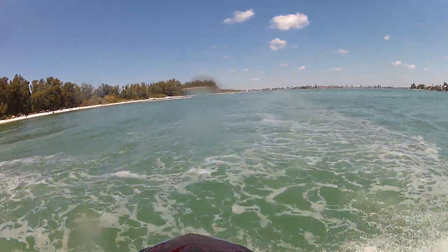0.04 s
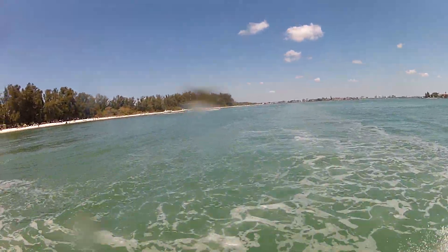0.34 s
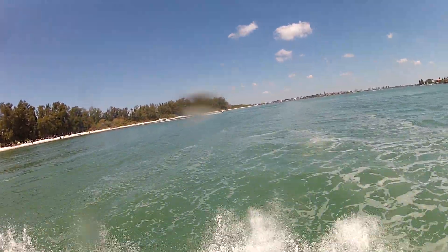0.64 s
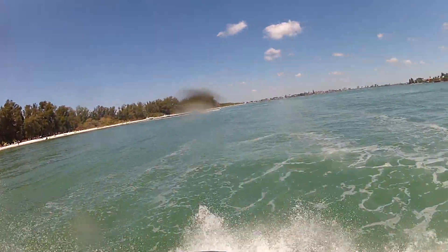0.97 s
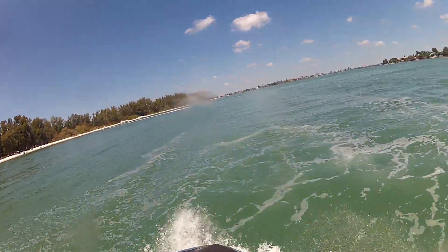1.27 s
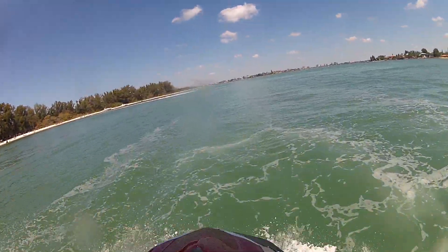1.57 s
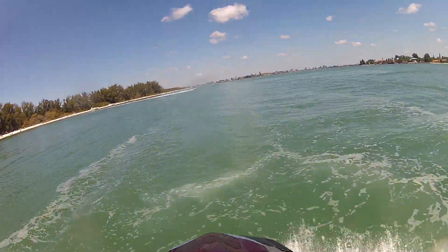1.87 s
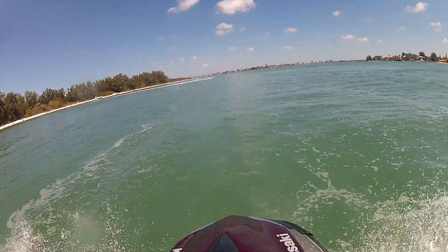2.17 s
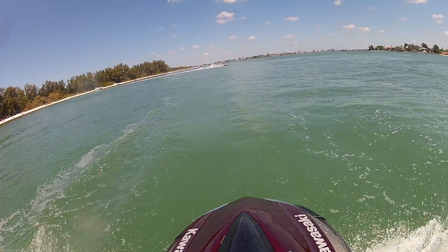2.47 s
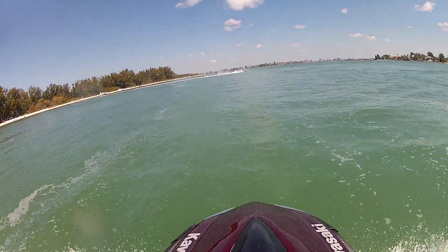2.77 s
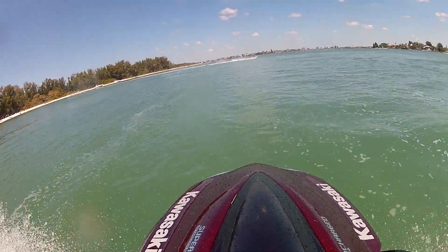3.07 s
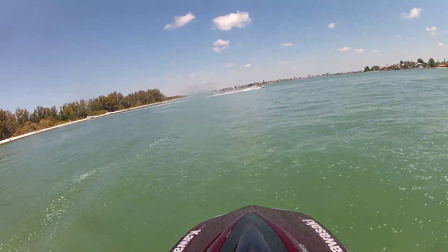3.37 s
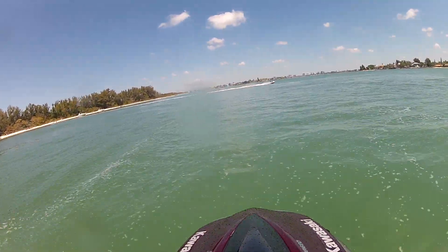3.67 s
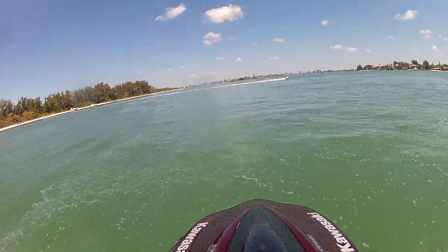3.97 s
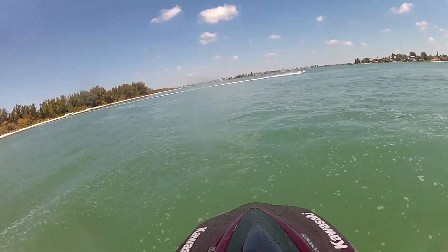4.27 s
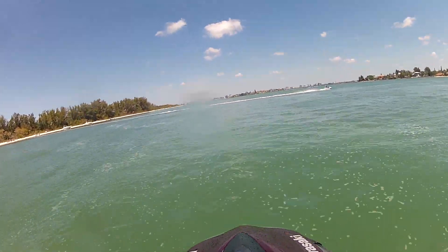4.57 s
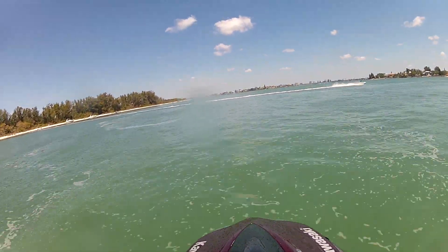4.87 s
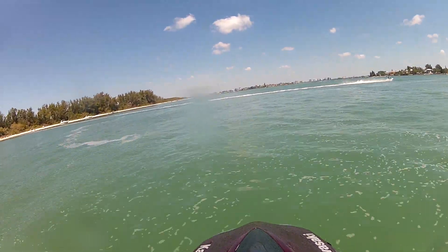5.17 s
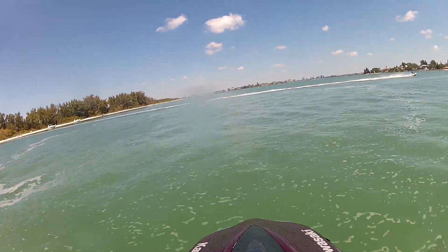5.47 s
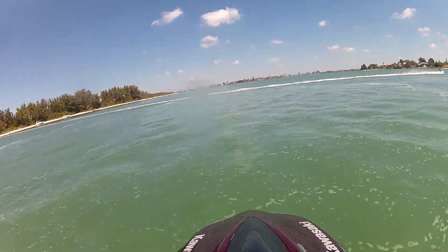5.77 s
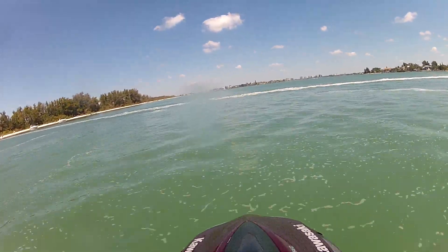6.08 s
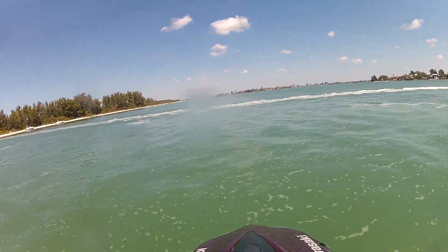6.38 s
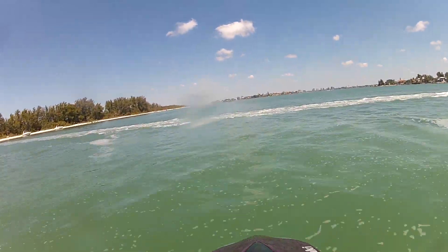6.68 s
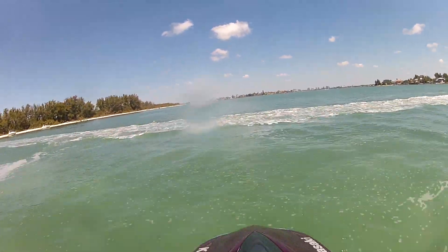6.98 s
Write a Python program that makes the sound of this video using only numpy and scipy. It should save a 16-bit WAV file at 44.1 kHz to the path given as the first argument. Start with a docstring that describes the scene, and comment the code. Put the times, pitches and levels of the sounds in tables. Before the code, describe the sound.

Close jet ski engine cruising with a whine and splashes, then accelerating hard into buffeting, whistling wind on open water.

```python
"""A jet ski on open water, heard up close from a cased camera worn by the rider.
It cruises through a turn: the four-cylinder engine hums, its gears whine and ring the hull, spray hisses.
At 3 s the throttle opens and the revs shoot up with thin, high tones. From 4 s the hull lifts on to the
plane over churning water; wind takes over, buffets the microphone and, past 5 s, whistles in the case.
Throughout, the recorder samples slowly and holds each sample, which gives a gritty treble."""
import sys
import numpy as np
from scipy import signal
from scipy.fft import rfft, irfft
from scipy.io import wavfile

SR = 44100
rng = np.random.default_rng(int(sys.argv[2]) if len(sys.argv) > 2 else 0)


def store_wav(level_fs):
    """Save 16-bit WAV to argv[1]."""
    pcm = np.round(np.clip(np.atleast_2d(level_fs), -1, 1) * 32767)
    wavfile.write(sys.argv[1], SR, pcm.T.astype(np.int16))


N = 310023
TIME = np.arange(N) / SR
HOLD_HZ = 8000  # the recorder's sampling rate

# air and water rushing past the rider, louder as the craft gathers speed: t/s, level/dB
RUSH = [(0.1, -46.5), (0.62, -44), (0.8, -46.5), (2.79, -46), (3.49, -33), (3.97, -30.5), (4.28, -25),
        (4.39, -27.5), (5.25, -20), (6.95, -21)]
# gusts on the case: middle t/s, length/s, wind lift/dB, buffeting lift/dB
GUSTS = [(.18, 0.34, 15, 7), (4.5, 0.064, 2, -2), (4.77, 0.081, 2.5, 2), (4.99, 0.097, 2, 3.5),
         (5.21, 0.24, 1, 4.5), (6.31, 0.13, 1.5, 0)]
# spectrum of the buffeting at the microphone: f/Hz, level/dB
BUFFET_SPECTRUM = [(12, -23), (28, -2), (50, -2.5), (85, -1.5), (160, -1), (230, -8.5), (330, -16.5),
                   (600, -21)]
# spectrum of the wind inside the case: f/Hz, level/dB
WIND_SPECTRUM = [(150, -22), (320, -15), (720, -15), (920, -7), (1110, -5), (1270, -5.5), (1530, -10.5),
                 (1900, -4), (2150, -2), (2440, 0), (2720, -5.5), (3050, -17.5), (3250, -16.5), (3620, -18)]
# the case whistles up: middle t/s, length/s, lift/dB, pitch bend/Hz, share of steady tone/0-1
CASE_WHISTLES = [(5.4, 0.39, 6.5, -21.5, 0.16), (5.78, .18, 8, 46, 0.44), (6.65, 0.086, 9, 11, 0.17),
                 (6.86, .26, 12.5, 100, 0.84)]
# spectrum of the water churning under the hull: f/Hz, level/dB
WASH_SPECTRUM = [(140, -1), (180, 0.5), (260, -14), (380, -11.5), (520, -7.5), (800, -10), (1000, -20),
                 (1500, -40)]
# spectrum of the spray: f/Hz, level/dB
SPRAY_SPECTRUM = [(150, -2), (290, -3), (400, -7.5), (730, -16.5), (960, -12.5), (1100, -0.5), (1280, -11),
                  (1680, -10.5), (1860, -2), (2080, -7.5), (2330, -2), (2700, -9), (3050, -13.5),
                  (3650, -14)]
# sheets of spray thrown up in the turn: middle t/s, length/s, lift/dB
SPLASHES = [(.02, 0.16, 5), (.43, 0.16, 3), (.65, 0.22, 2.5), (1.25, 0.2, 2.5), (1.47, .12, 2.5)]
# engine speed as a firing rate: t/s, f/Hz
FIRING_RATE = [(0, 119.6), (.45, 117), (.77, 116), (1.07, 115.3), (1.42, 116.5), (1.52, 122.6),
               (1.8, 126.5), (2, 133.5), (2.2, 135.4), (2.72, 139.1), (2.8, 146.4), (2.9, 171),
               (3.06, 226.6), (3.2, 245), (3.3, 247.9), (3.65, 251.5), (3.96, 256.1), (7.03, 254)]
# thin, high engine tones as the revs rise: start t/s, length/s, f/Hz, level/dB
HIGH_TONES = [(1.56, 0.1, 2450, -48), (3.08, .05, 2400, -35), (3.138, .27, 2874, -38)]
# hull resonances rung by the gears: f/Hz, width/Hz, level/dB
HULL_MODES = [(1075, 95, -1.5), (1839, 193, 3.5), (3210, 199, -2.5)]
# flares of the gear whine: middle t/s, length/s, lift/dB
WHINE_FLARES = [(.03, .36, 9.5), (1.23, 0.12, 7), (1.46, .12, 8), (2.45, 0.94, 4.5), (3.125, 0.1, 13)]
# orders that stand out of the clatter: multiple of the four-firing cycle, lift/dB
CLATTER_ORDERS = {8: 0, 10: 3.3, 11: 13.5, 13: 5.9, 16: 4.1, 17: 7.8, 18: 7.5, 20: 6.87, 28: 5.65, 40: 12.5,
                  45: 4, 62: 17.6}
# how the engine bay passes the clatter: f/Hz, level/dB
BAY_RESPONSE = [(300, -14.5), (500, -14.5), (600, -7), (690, -13), (800, -15.5), (950, -3.5), (1100, 4),
                (1200, -2), (1350, -19), (1850, -7), (2050, -20), (2380, -18), (2650, -11.5), (3300, -19)]
# how the exhaust passes the firing hum: f/Hz, level/dB
EXHAUST_RESPONSE = [(117, -36), (136, -37.5), (165, -36), (205, -43), (232, -41.5), (248, -28.5)]
# spells in which the engine booms: middle t/s, length/s, shaft throb lift/dB, hum overtone lift/dB
BOOMS = [(3.64, 0.45, 16.5, 0), (3.93, 0.39, 4, 13), (4.4, 0.48, 12, 12)]


def undb(db):
    """Decibels to gain."""
    return 10 ** (np.asarray(db) / 20)


def unit(x):
    """Scale to rms 1."""
    return x / np.std(x)


def switch(x):
    """A smooth step from 0 to 1 around x = 0."""
    return .5 + .5 * np.tanh(x / 2)


def phase_of(hz):
    """Running phase in radians."""
    return 2 * np.pi * np.cumsum(hz) / SR


def swells(table, column=0, squareness=3):
    """Rounded rises and falls, one for each row of middle t/s, length/s, heights."""
    return sum(heights[column] * np.exp(-np.abs(2 * (TIME - middle) / length) ** squareness)
               for middle, length, *heights in table)


def walk(rate, count=8192):
    """A smooth random wander with spread 1, changing about rate times a second."""
    hz = np.arange(count // 2 + 1) * SR / N
    slow = irfft(rfft(rng.standard_normal(count)) * np.exp(-(hz / rate) ** 2))
    return unit(np.interp(np.arange(N) * count / N, np.arange(count), slow))


def colour(x, spectrum):
    """Filter x by points of f/Hz, level/dB, rolled off at both ends; rms 1."""
    hz, db = np.transpose(spectrum)
    f = np.arange(1, N // 2 + 2) * SR / N
    ends = 1 / np.sqrt((1 + (hz[0] / f / 2) ** 4) * (1 + (f / HOLD_HZ * 2) ** 20))
    gain = undb(np.interp(np.log(f), np.log(hz), db))
    return unit(irfft(rfft(x) * ends * gain, N))


def ring(x, hz, width):
    """A steep resonance with gain 1 at its centre."""
    b, a = signal.iirpeak(hz, hz / width, fs=SR)
    return signal.lfilter(b, a, signal.lfilter(b, a, x))


def buffet(rush_db, offset_db=-1, ceiling_db=-28, unsteady_db=1.5):
    """Air strikes the case right at the microphone: a rumble that grows with the rush, then levels off."""
    strength = 1 / np.hypot(undb(-rush_db - offset_db), undb(-ceiling_db))
    rumble = colour(rng.standard_normal(N), BUFFET_SPECTRUM)
    return rumble * strength * undb(swells(GUSTS, column=1) + unsteady_db * walk(4.4))


def wind(eddy_db=0.85, fine_eddy_db=1.0):
    """Turbulent air rings the hollow case around the microphone; eddies shake its level."""
    eddies = undb(eddy_db * walk(34) + fine_eddy_db * walk(230))
    return colour(rng.standard_normal(N) * eddies, WIND_SPECTRUM)


def case_whistle(rush_db, cavity_hz=1069, base_db=-27, db_per_rush_db=3, breadth_hz=90, waver=0.01103):
    """Air across the case's edge rings its cavity: breathy, but a steadier tone in the strongest gusts."""
    db = base_db + db_per_rush_db * (rush_db - rush_db.max()) + swells(CASE_WHISTLES)
    hz = cavity_hz + swells(CASE_WHISTLES, column=1, squareness=1.54)
    steady = np.clip(swells(CASE_WHISTLES, column=2), 0, 1)
    phase = phase_of(hz * (1 + waver * walk(23.2)))
    breathy = walk(breadth_hz) * np.sin(phase) + walk(breadth_hz) * np.cos(phase)
    return (np.sqrt(2 * steady) * np.sin(phase) + np.sqrt(1 - steady) * breathy) * undb(db)


def wash(middle_s=4.69, length_s=1.4, peak_db=-33.5, churn_db=1.0):
    """Water churns under the hull, a hollow rush that swells and dies away as the craft lifts."""
    envelope = swells([(middle_s, length_s, 1)])
    water = colour(rng.standard_normal(N), WASH_SPECTRUM)
    return water * envelope * undb(peak_db + churn_db * walk(11.3))


def spray(drops_per_s=2500, drop_spread_db=2.0, drop_gain=0.65, surge_db=0.6):
    """Sheets of water hiss off the hull and droplets patter on the case."""
    hits = (rng.random(N) < drops_per_s / SR) * rng.standard_normal(N)
    drops = unit(hits * undb(drop_spread_db * np.minimum(rng.exponential(size=N), 5)))
    hiss = rng.standard_normal(N)
    return colour(hiss + drop_gain * drops, SPRAY_SPECTRUM) * undb(surge_db * walk(17))


def high_tones(attack_s=0.056, release_s=.05, slide_hz=120, slide_s=0.046, waver=0.0019, flutter_db=1.5):
    """Thin, high engine tones that slide up and fade as the revs rise."""
    tones = 0
    drift = 1 + waver * walk(33)
    for start, length, hz, db in HIGH_TONES:
        age = np.maximum(TIME - start, 0)
        pitch = hz - slide_hz * np.exp(-age / slide_s)
        envelope = np.minimum(age / attack_s, 1) * np.exp(-np.maximum(age - length, 0) / release_s)
        tones += np.sin(phase_of(pitch * drift)) * envelope * undb(db)
    return tones * undb(flutter_db * walk(25))


def gears(phase, firing_hz, octaves_down, drive_db=-31.5, db_per_octave=15, flutter_db=1):
    """Mesh tones flare up whenever the engine speed carries one through a hull resonance."""
    whine_db = drive_db - db_per_octave * octaves_down + swells(WHINE_FLARES, squareness=8)
    tooth = phase * 31 / 4  # 31 teeth mesh in four firings
    overtones = undb(-2) * np.sin(2 * tooth) + undb(-8) * np.sin(3 * tooth)
    low_revs = switch((155 - firing_hz) / 10)  # overtones fade above a firing rate of 155 Hz
    mesh = np.sin(tooth) + overtones * low_revs
    hull = sum(undb(db) * ring(mesh, hz, width) for hz, width, db in HULL_MODES)
    return hull * undb(whine_db + flutter_db * walk(38))


def crank(firing_hz, chop_waver=.0008, rev_waver=.016, fast_rise_hz_per_s=329):
    """Phase of the firings: it wavers with the pump's load in the chop, far more as the revs shoot up."""
    revving = np.minimum(np.abs(np.gradient(firing_hz)) * SR / fast_rise_hz_per_s, 1) ** 2
    return phase_of(firing_hz * (1 + chop_waver * walk(17) + rev_waver * revving * walk(56)))


def clatter(phase, octaves_down, full_revs_db=-32, fall_db=19, wobble_db=3.5, rasp_db=-4):
    """Four unequal cylinders repeat every four firings; their orders and rasp ring the engine bay."""
    cycle = phase / 4
    orders = 0
    for k in range(6, 64):
        tone = np.sin(k * cycle + 2 * np.pi * rng.random())
        orders += tone * undb(CLATTER_ORDERS.get(k, 0) + wobble_db * walk(28))
    rasp = rng.standard_normal(N) * (1 + .5 * np.cos(phase))  # pulses at each firing
    bay = colour(unit(orders) + undb(rasp_db) * unit(rasp), BAY_RESPONSE)
    return bay * undb(full_revs_db - fall_db * octaves_down ** 1.7)


def shaft_throb(phase, octaves_down, base_db=-44, db_per_octave=24, wobble_db=0.7):
    """The shaft throbs at half the firing rate, weaker at low revs."""
    db = base_db - db_per_octave * octaves_down + swells(BOOMS, squareness=3.1)
    return np.sin(phase / 2) * undb(db + wobble_db * walk(6.9))


def exhaust(phase, firing_hz, planing_s=3.99, planing_db=-6.5, overtone_db=-12, muffler_hz=270):
    """The firings hum; once the hull is on the plane the level drops and wavers more over the chop."""
    planing = switch((TIME - planing_s) / 0.033)
    wobble_db = (1.4 + 1.6 * planing) * walk(17)
    hum_db = np.interp(firing_hz, *np.transpose(EXHAUST_RESPONSE)) + planing_db * planing + wobble_db
    # the wet muffler swallows the overtone as the revs rise
    overtone = signal.sosfilt(signal.butter(2, muffler_hz, fs=SR, output="sos"), np.sin(2 * phase))
    overtone *= undb(overtone_db + swells(BOOMS, column=1) + 2 * walk(10))
    return (np.sin(phase) + overtone) * undb(hum_db)


def engine(full_revs_hz=257):
    """The engine just below the rider: one crank drives hum, throb, clatter and gears; high tones join."""
    firing_hz = np.interp(TIME, *np.transpose(FIRING_RATE))
    octaves_down = np.maximum(np.log2(full_revs_hz / firing_hz), 0)
    phase = crank(firing_hz)
    drone = exhaust(phase, firing_hz) + shaft_throb(phase, octaves_down)
    return drone + clatter(phase, octaves_down) + gears(phase, firing_hz, octaves_down) + high_tones()


def scene(spray_db=4, wind_db=3.64, wind_onset_db=-30.5, onset_width_db=3):
    """Engine, water and air at the rider's microphone, in mono; wind overtakes spray as the rush grows."""
    rush_db = np.interp(TIME, *np.transpose(RUSH))
    wind_share = switch((rush_db - wind_onset_db) / onset_width_db)
    motor = engine()
    water = np.sqrt(1 - wind_share) * spray() * undb(rush_db + spray_db + swells(SPLASHES))
    air = np.sqrt(wind_share) * wind() * undb(rush_db + wind_db + swells(GUSTS))
    return (motor + water + air + case_whistle(rush_db) + buffet(rush_db) + wash())[None]


def record(dry, band_hz=3730, top_hz=15250):
    """A narrow-band recorder holds each sample four times over, mirroring the sound into the treble."""
    padded = np.pad(dry, [(0, 0), (0, SR // 10)])
    size = padded.shape[1]
    narrow = signal.sosfilt(signal.butter(20, band_hz, fs=SR, output="sos"), padded)
    slow = signal.resample(narrow, round(size * HOLD_HZ / SR), axis=1)
    slow = signal.sosfilt(signal.butter(2, 3850, fs=HOLD_HZ, output="sos"), slow)
    held = signal.resample(np.repeat(slow, 4, axis=1), size, axis=1)[:, :N]
    return signal.sosfilt(signal.ellip(14, .2, 80, top_hz, fs=SR, output="sos"), held)


dry = scene()
out = record(dry)
store_wav(out)
```